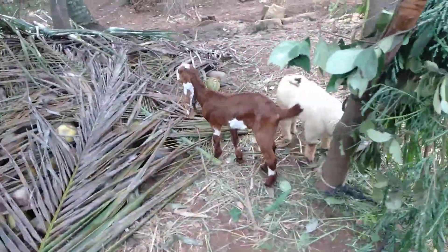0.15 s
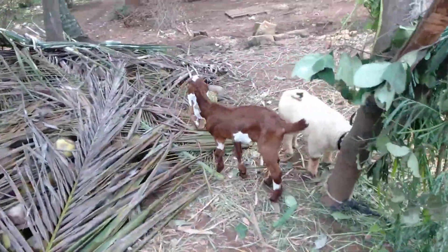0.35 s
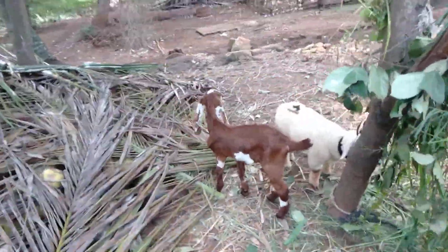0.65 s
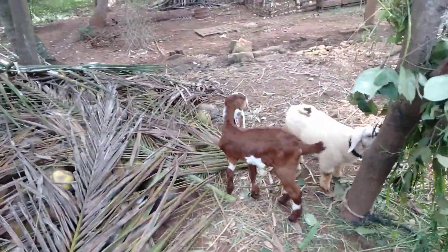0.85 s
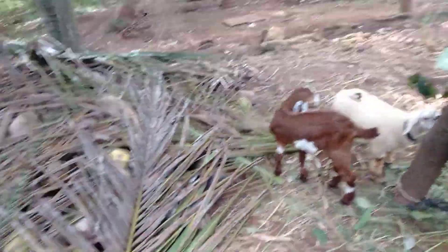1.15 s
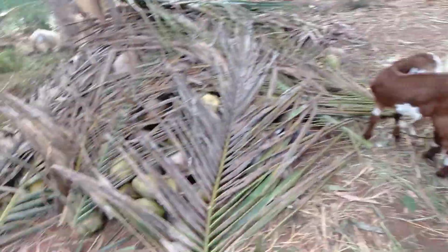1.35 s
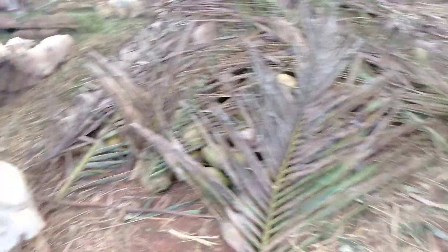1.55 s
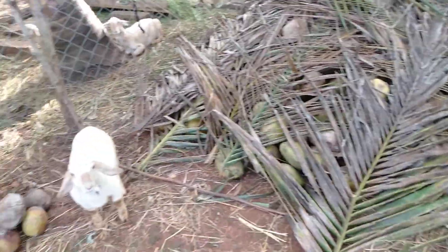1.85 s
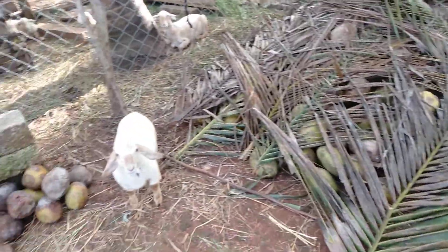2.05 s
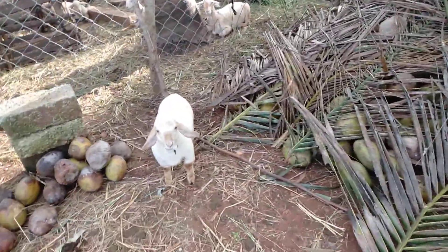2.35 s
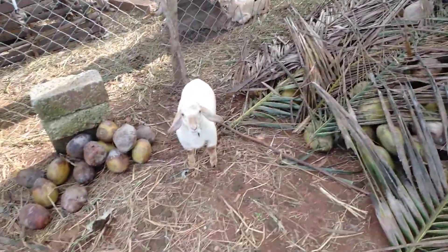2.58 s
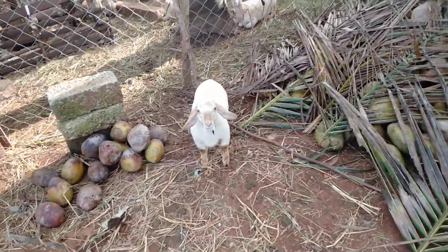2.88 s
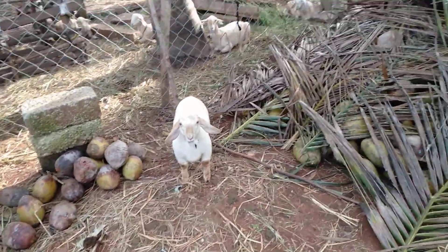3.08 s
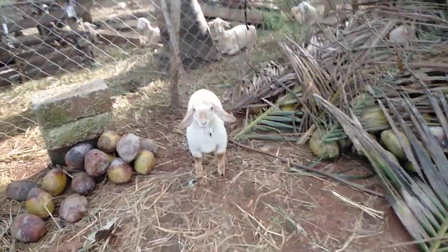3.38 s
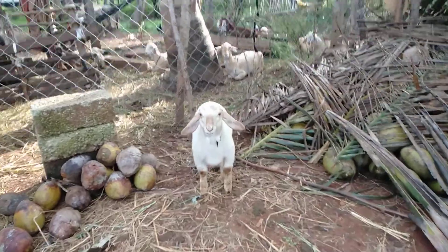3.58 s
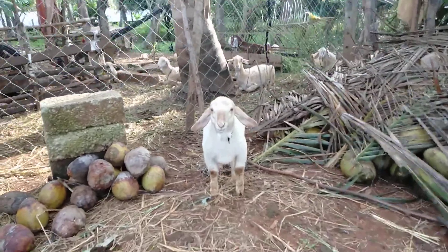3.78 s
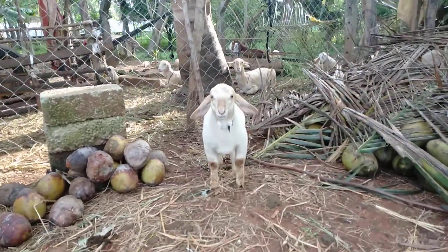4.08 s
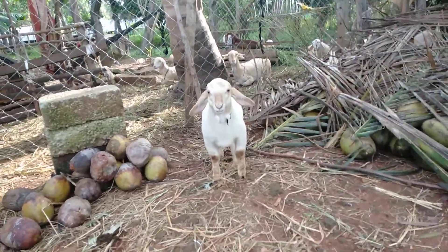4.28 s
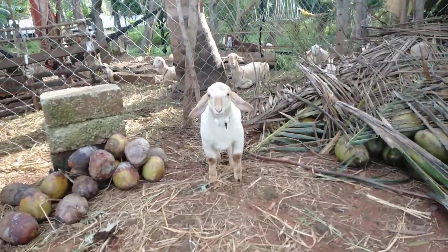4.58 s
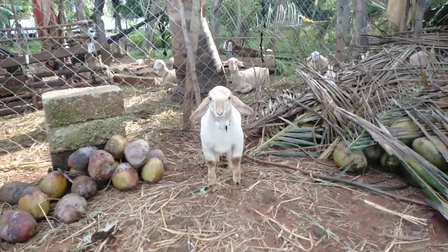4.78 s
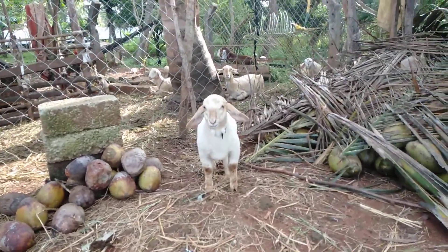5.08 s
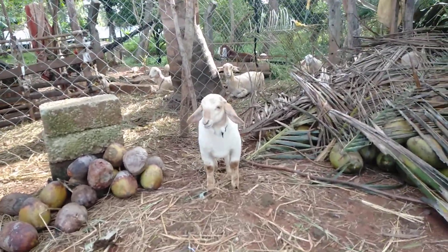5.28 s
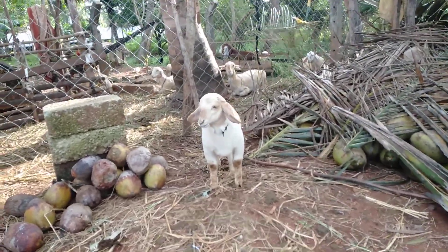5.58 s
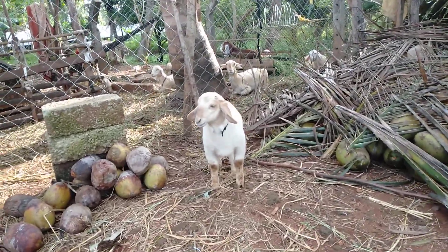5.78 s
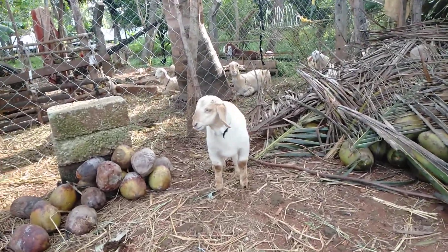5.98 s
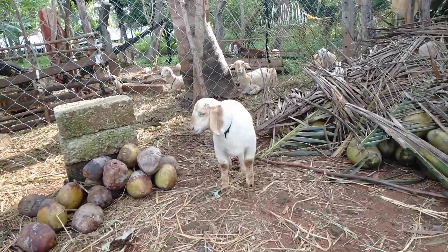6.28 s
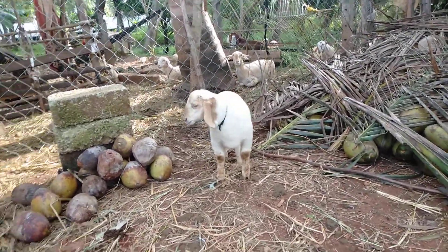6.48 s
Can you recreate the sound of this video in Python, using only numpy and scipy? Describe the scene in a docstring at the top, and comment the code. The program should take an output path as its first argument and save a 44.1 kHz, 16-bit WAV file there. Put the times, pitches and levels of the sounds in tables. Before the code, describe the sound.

In a quiet farmyard, small birds chip and whistle in the trees and distant fowl call over a faint rumble and high hiss. Dry stalks snap now and then as young goats shift about. Just past halfway comes one loud, kiss-like smack close to the microphone, with soft handling bumps around it. More crisp snaps follow, the sharpest near the end.

```python
"""A quiet farmyard, where goat kids stand among dry fronds and straw.
Over a low rumble and a steady high hiss, birds chip and whistle in echoing trees and far fowl call.
A hand shifts on a phone with soft bumps and a faint rub, and dry stalks snap now and then.
Close by comes one loud, kiss-like smack: skin sticks and slips, making a small hollow ring."""
import sys
import numpy as np
from scipy import signal
from scipy.fft import rfft, irfft, next_fast_len
from scipy.io import wavfile
from scipy.ndimage import map_coordinates

SR = 44100
rng = np.random.default_rng(int(sys.argv[2]) if len(sys.argv) > 2 else 0)


def transcribe(u):
    """Save the signal u as a 16-bit wav file named by the first command-line argument.

    u: samples, shape (n,) or (channels, n), limited to [-1, 1]; the rate is SR.
    q: integer samples, one column per channel.
    """
    v = np.clip(np.atleast_2d(u).T, -1, 1)
    q = np.round(v * 32767).astype(np.int16)
    wavfile.write(sys.argv[1], SR, q)


N = 292824
T = np.arange(N) / SR


def amp(db):
    """Turn decibels into a number to multiply by."""
    return 10 ** (np.asarray(db) / 20)


def unit(x):
    """Scale a sound to an average (rms) size of 1."""
    return x / np.sqrt(np.mean(x ** 2) + 1e-20)


def add(track, start, x):
    """Mix x into the track, beginning at start seconds."""
    part = track[round(start * SR):][:len(x)]
    part += x[:len(part)]


def colour(x, points, size=16384):
    """Shape the lows and highs along (Hz, dB) points; white noise keeps its overall level."""
    hz, db = np.transpose(points)
    gain = amp(np.interp(np.log(np.fft.rfftfreq(size, 1 / SR) + 1), np.log(hz), db))
    # build the filter so that it rings only after a sound, never before
    cepstrum = irfft(np.log(np.maximum(gain, 1e-5)))
    cepstrum[1:size // 2] *= 2
    cepstrum[size // 2 + 1:] = 0
    response = irfft(np.exp(rfft(cepstrum)))
    return signal.fftconvolve(x, response / np.linalg.norm(response))[:len(x)]


def wobble(rate):
    """A smooth curve through rate random values a second."""
    return map_coordinates(rng.standard_normal(int(N * rate / SR) + 4), [T * rate])


def crackle(rate, spread_db):
    """Noise that comes in tiny clumps."""
    return unit(rng.standard_normal(N) * amp(spread_db * wobble(rate)))


def swell(length):
    """A smooth rise and fall lasting length seconds."""
    return np.sin(np.linspace(0, np.pi, int(length * SR)))


# tone of the distant rumble: f/Hz, relative level/dB
RUMBLE_TONE = [(12, -24), (20, -0.5), (54, 0.5), (77, -5), (109, -2), (163, -6), (192, -6.5), (318, -15),
               (474, -11.5), (585, -11.5), (1190, -15), (1740, -15.5), (3000, -25.5), (3900, -47),
               (6600, -120)]
# tone of the high background hiss: f/Hz, relative level/dB
HISS_TONE = [(1760, -31.5), (3000, -4), (3860, -3), (4800, -6), (5250, -3), (5960, 3), (8640, -7),
             (9600, -11.5), (13600, -12), (15000, -16), (16000, -14)]

def yard():
    """A far-off rumble slowly eases under a steady high hiss, coloured by the microphone."""
    rumble = amp(-58.5 - 0.16 * T + 0.25 * wobble(7.1)) * unit(colour(rng.standard_normal(N), RUMBLE_TONE))
    hiss = amp(-68 + 0.81 * wobble(10)) * unit(colour(rng.standard_normal(N), HISS_TONE))
    return rumble + hiss


def tree_echo(x, fade_s, build_s):
    """Trunks and leaves scatter a sound into echoes that build up, then drop 60 dB in fade_s."""
    t = np.arange(SR) / SR
    tail = rng.standard_normal(SR) * amp(-60 * t / fade_s) * (1 - np.exp(-t / build_s))
    return signal.fftconvolve(x, tail / np.linalg.norm(tail))[:len(x)]


def bird_note(hz, rasp, octave_db):
    """A pure note plus a weak one an octave up; rasp shakes the pitch to make it hoarse."""
    flutter = map_coordinates(rng.standard_normal(len(hz)), [np.arange(len(hz)) * 600 / SR])
    phase = 2 * np.pi * np.cumsum(hz * (1 + rasp * flutter)) / SR
    return np.sqrt(2) * (np.sin(phase) + amp(octave_db) * np.sin(2 * phase))


def glide(length, hz, fall, rasp, arch=0):
    """A swelling note that slides down (up if fall is negative); arch lowers both its ends."""
    loudness = np.sqrt(np.abs(swell(length)))
    position = np.linspace(-1, 1, len(loudness))
    pitch = hz * (1 - fall * position / 2 - arch * position ** 2)
    return loudness * bird_note(pitch, rasp, octave_db=-13)


# high peeps of tiny birds: t/s, f/Hz, relative level/dB
PEEP_CALLS = [(.12, 7240, -53.5), (.28, 6660, -63.5), (1.082, 6520, -59.5), (1.567, 6710, -60),
              (2.173, 7130, -63), (5.48, 6700, -58.5)]
# falling chirps: t/s, f/Hz, fall/share of pitch, relative level/dB
CHIRP_CALLS = [(.865, 3450, 0.145, -70), (1.022, 4110, .22, -76), (3.246, 4220, .13, -56),
               (3.745, 4250, .16, -56.5), (4.259, 4260, .14, -60), (4.507, 2720, 0.026, -69.5),
               (4.868, 4170, 0.05, -62.5)]
# fowl cries and clucks: t/s, length/s, f/Hz, fall/share of pitch, relative level/dB, rasp/share of pitch
FOWL_CALLS = [(.028, 0.095, 1550, -.08, -61, 0.045), (.46, 0.11, 1476, -.11, -60, .07),
              (.6, .28, 1713, -.02, -62.5, .015), (1.344, 0.023, 2066, 0, -59, 0.019),
              (3.014, 0.028, 2130, -0.012, -56.5, .01), (3.317, 0.039, 1990, 0, -56, 0.057),
              (3.649, 0.22, 1977, .02, -55.5, 0.065), (4.9, 0.19, 1622, 0.2, -60.5, 0.04),
              (5.022, 0.2, 1903, .23, -62, .02)]

def far_birds():
    """Distant peeps, chirps and clucks arrive with about as much echo as direct sound."""
    calls = np.zeros(N)
    for start, hz, db in PEEP_CALLS:
        add(calls, start, amp(db) * glide(length=0.067, hz=hz, fall=0.066, rasp=0.0247))
    for start, hz, fall, db in CHIRP_CALLS:
        rasp = .039 * amp(db + 57.5)  # softer chirps are purer
        add(calls, start, amp(db) * glide(length=.11, hz=hz, fall=fall, rasp=rasp))
    for start, length, hz, fall, db, rasp in FOWL_CALLS:
        add(calls, start, amp(db) * glide(length, hz, fall, rasp, arch=0.0225))
    # the air soaks up the highest treble on the way
    calls = signal.sosfilt(signal.butter(8, 9600, fs=SR, output="sos"), calls)
    return amp(-5.5) * calls + amp(-5.0) * tree_echo(calls, fade_s=0.86, build_s=0.004)


def song(calls, bend, shape_db, rasp):
    """One bird repeats its call, its pitch times bend; leaves in the way make the level flutter."""
    notes = np.zeros(N)
    soft_ends = signal.windows.tukey(len(bend), .33)
    for start, hz, db in calls:
        add(notes, start, amp(db + shape_db) * soft_ends * bird_note(hz * bend, rasp, octave_db=-42))
    return notes * amp(1.7 * wobble(120))


# thin whistles: t/s, top f/Hz, relative level/dB
WHISTLE_CALLS = [(3.975, 6400, -60.5), (6.278, 6400, -62)]

def whistling_bird(scoop_s=.11, sink_s=0.15, fade_db_per_s=84):
    """A near bird's whistle dips, climbs back to its loudest point, then sinks away."""
    t = np.arange(-scoop_s, sink_s, 1 / SR)
    scoop = 0.13 * np.sin(np.pi * np.clip(1 + t / scoop_s, 0, 1) ** 0.62) ** 2
    sink = 0.27 * (np.maximum(t, 0) / sink_s) ** 2
    whistles = song(WHISTLE_CALLS, 1 - scoop - sink, -fade_db_per_s * np.abs(t), rasp=0.0015)
    return amp(0.1) * whistles + amp(-5.5) * tree_echo(whistles, fade_s=0.35, build_s=0.0092)


# short, hooked chips: t/s, starting f/Hz, relative level/dB
CHIP_CALLS = [(.033, 3327, -52), (1.398, 3320, -50.5), (2.732, 3380, -56), (3.076, 3380, -54),
              (3.376, 3387, -55), (3.703, 3410, -54), (5.803, 3425, -55), (6.135, 3386, -51.5)]

def chipping_bird(hold_s=0.031, slide_s=0.042, fade_db_per_s=180):
    """A near bird holds a note, then hooks it downward, loudest at the bend."""
    t = np.arange(-hold_s, slide_s, 1 / SR)
    slide = 0.27 * np.sin(np.pi / 2 * np.maximum(t, 0) / slide_s) ** 2
    chips = song(CHIP_CALLS, 1 - slide, -fade_db_per_s * np.abs(t), rasp=.011)
    early_echo = amp(-4) * tree_echo(chips, fade_s=0.09, build_s=0.002)
    late_echo = amp(-9.5) * tree_echo(chips, fade_s=0.62, build_s=0.032)
    return amp(-5.5) * chips + early_echo + late_echo


# jolts of the phone in the hand: t/s, length/s, level/dB
JOLTS = [(3.056, 0.13, -49), (3.318, 0.084, -46), (3.462, 0.21, -44.5), (4.245, 0.18, -47.5),
         (4.328, 0.035, -42.5), (4.43, 0.17, -59.5), (5.652, 0.06, -53.5), (6.6, 0.068, -45.5)]
# dull tone of a jolt: f/Hz, relative level/dB
JOLT_TONE = [(12, -30.5), (20, 11.5), (48, -2.5), (99, -0.5), (191, -14), (278, -40), (400, -29),
             (520, -47), (880, -120)]
# how strongly the hand rubs: t/s, relative level/dB
RUB_LEVELS = [(0.0, -75), (0.89, -83.5), (1.68, -70), (2.25, -77.5), (2.72, -71), (2.83, -73), (3.9, -68),
              (4.62, -79.5), (4.86, -75), (5.12, -71.5), (5.69, -69), (6.12, -70), (6.31, -64), (6.64, -64)]
# hissy tone of skin on the case: f/Hz, relative level/dB
RUB_TONE = [(2940, -45), (5000, -17), (6960, -6), (8880, -18), (10600, -18.5), (12800, -13.5),
            (15100, -3.5), (16000, -16)]

def hand_on_phone():
    """Low bumps travel through the phone's body while skin hisses over its case."""
    push = np.zeros(N)
    for start, length, db in JOLTS:
        add(push, start, amp(db) * swell(length))
    times, rub_db = np.transpose(RUB_LEVELS)
    drag = amp(np.interp(T, times, rub_db) + 2.5)
    finger_slide = amp(-64) * np.sqrt(np.abs(swell(length=0.25)))
    add(drag, 6.08, finger_slide)
    rub = colour(drag * crackle(rate=700, spread_db=1.5), RUB_TONE)
    bumps = push * unit(colour(rng.standard_normal(N), JOLT_TONE))
    return bumps + rub


# dry stalks breaking: t/s, relative level/dB, extra level of the dull part/dB, rustle length/s
BREAKS = [(2.4915, -35.5, -3, 0.055), (2.7064, -47, -15, 0.006), (3.0881, -47, 12.5, 0),
          (3.1749, -42.5, 4, 0.024), (4.787, -39, -22, 0.0037), (4.9828, -38, -22, 0.12),
          (5.095, -47.5, -15, 0.057), (5.2975, -31.5, -22, 0), (5.3149, -26, -23, 0.077),
          (5.39, -37.5, -22, 0.059), (5.6226, -44, -20, 0), (5.8157, -36.5, -14, 0.023),
          (5.86, -45, -14, 0.11), (6.508, -39.5, -22, 0), (6.5189, -23, -34, 0.042)]
# crisp tone of straw: f/Hz, relative level/dB
CRISP_TONE = [(1760, -48), (3000, -19), (3380, -6.5), (3830, -11.5), (4200, -5.5), (5840, -9), (7050, 3),
              (9530, -13.5), (11800, -9.5), (15100, 1), (16000, -2.5)]
# duller tone of a stalk's body: f/Hz, relative level/dB
BODY_TONE = [(400, -35), (900, 2.5), (2400, 2), (4200, -1), (6000, -28)]

def dry_straw(splinter_s=.012, splinter_db=-11):
    """Stalks snap, then splinter more softly, most inside a short rustle: crisp on top, dull below."""
    crisp, body = np.zeros(N), np.zeros(N)
    t = np.arange(SR // 5) / SR
    snap = amp(-60 * t / 0.0042) + amp(-8.5 - 60 * t / 0.023)  # a sharp edge and a weaker tail
    for start, db, body_db, length in BREAKS:
        for lag, step_db in [(0, 0), (splinter_s, splinter_db)]:
            add(crisp, start + lag, amp(db + step_db - 8) * snap)
            add(body, start + lag, amp(db + step_db + body_db - 10.5) * snap)
        rustle = amp(-41.3 + .4 * db) * swell(length)  # louder breaks rustle more
        rustle_start = start - .29 * length
        add(crisp, rustle_start, rustle)
        add(body, rustle_start, amp(-9.5) * rustle)
    # faint stray ticks as the goats shift and nibble
    for when, size, dullness in rng.random((40, 3)):
        tick = amp(-69.0 + 12 * size - 60 * t / 0.046)
        add(crisp, when * N / SR, tick)
        add(body, when * N / SR, amp(1.5) * dullness * tick)
    crisp_sound = colour(crisp * crackle(rate=1200, spread_db=-0.5), CRISP_TONE)
    body_sound = colour(body * crackle(rate=900, spread_db=5.0), BODY_TONE)
    return crisp_sound + body_sound


# notes of the dull knock under the smack: f/Hz, relative level/dB
KNOCK_NOTES = [(140, -41), (360, -43), (500, -35)]
# ringing notes of the small hollow: f/Hz, relative level/dB, fade time/s
HOLLOW_NOTES = [(1374, 9.5, 0.029), (1530, -21.5, 0.015), (1830, -10, 0.03), (1910, -13, .018),
                (2240, -33, .018), (2720, -3, 0.019), (2960, -18, 0.027), (3160, 5, 0.027),
                (3760, -28, .016), (5820, -10, 0.031), (6080, -9, 0.042), (7040, -9, 0.014)]
# broad tone of the smack: f/Hz, relative level/dB
SMACK_TONE = [(150, -30), (290, -9.5), (420, -5), (650, -9.5), (1000, -31.5), (1400, 10), (1900, -0.5),
              (3000, -4), (4000, -16), (5200, -31), (6500, -4.5), (8000, -12.5), (11000, -46.5),
              (13000, -11), (16000, -17)]

def smack(start=3.5997, length=.048):
    """Skin sticks and slips in ever faster jerks that ring a small hollow and end in a squeak."""
    t = np.arange(int(length * SR)) / SR
    squeak_at_s, quicken_s = .0285, .004
    squeak_jump_hz = 1746 / (1 + np.exp((squeak_at_s - t) / quicken_s))
    slip_hz = 657 + 9000 * t + squeak_jump_hz
    slip_hz *= 1 + .04 * wobble(700)[:len(t)]  # the slipping is uneven
    # the skin peels softly, pushes fully, then lets go, leaving a little force for the squeak
    peel_until_s, hold_until_s, release_db_per_s = 0.0014, 0.0093, 2105
    push_db = np.where(t < peel_until_s, -16, -release_db_per_s * np.maximum(t - hold_until_s, 0))
    squeak_db = -20 - 332 * t
    force = amp(np.maximum(push_db, squeak_db))
    slips = np.diff(np.ceil(np.cumsum(slip_hz) / SR), prepend=0)  # one click for each slip
    drag = amp(-20.5 + 130 * t) * rng.standard_normal(len(t))  # dragging skin adds more and more hiss
    jerks, knock = np.zeros(N), np.zeros(N)
    add(jerks, start, force * (slips * amp(.28 * rng.standard_normal(len(t))) + drag))
    # the same push gives a dull knock
    add(knock, start, force * sum(amp(db) * np.sin(2 * np.pi * hz * t) for hz, db in KNOCK_NOTES))
    t = np.arange(SR // 10) / SR
    ring = sum(amp(db - 60 * t / fade) * np.cos(2 * np.pi * hz * t) for hz, db, fade in HOLLOW_NOTES)
    ringing = signal.fftconvolve(jerks, ring / np.linalg.norm(ring))[:N]
    return amp(-5.0) * colour(jerks, SMACK_TONE) + amp(-8.8) * ringing + knock


def scene():
    """All the farmyard's sounds, added into one channel."""
    background = yard() + chipping_bird() + whistling_bird() + far_birds()
    return (background + dry_straw() + hand_on_phone() + smack())[None]


def record(dry, top_hz=16050):
    """The phone keeps no sound higher than top_hz."""
    size = next_fast_len(N + SR // 2)
    kept = np.fft.rfftfreq(size, 1 / SR) < top_hz
    return irfft(rfft(dry, size) * kept, size)[..., :N]


dry = scene()
out = record(dry)
transcribe(out)
```